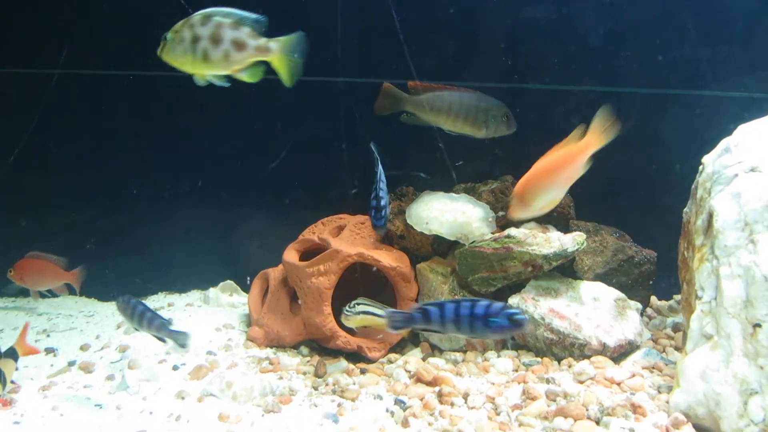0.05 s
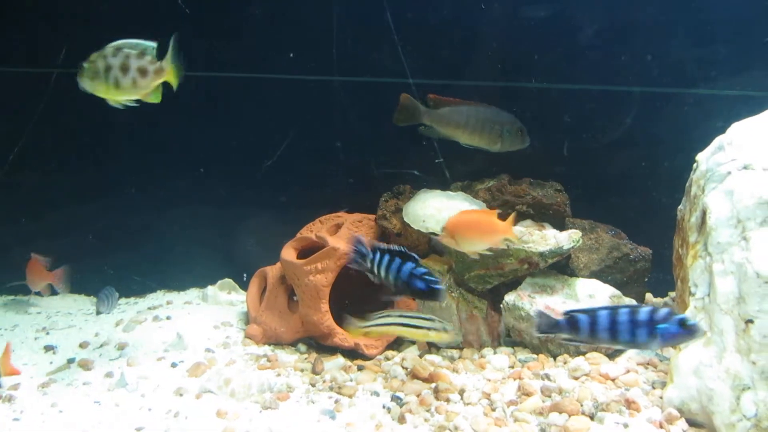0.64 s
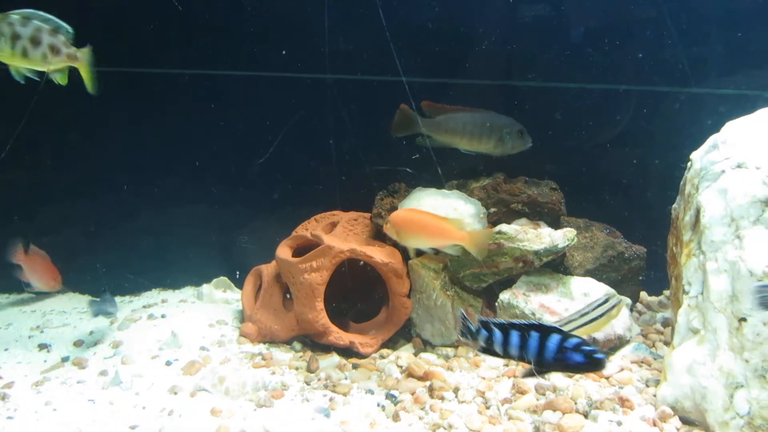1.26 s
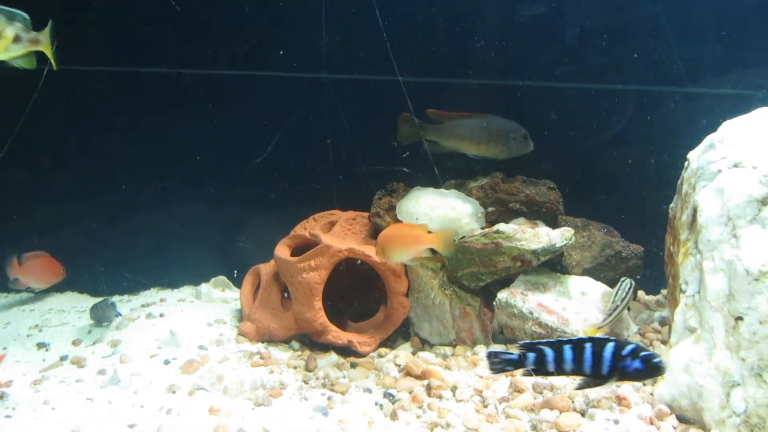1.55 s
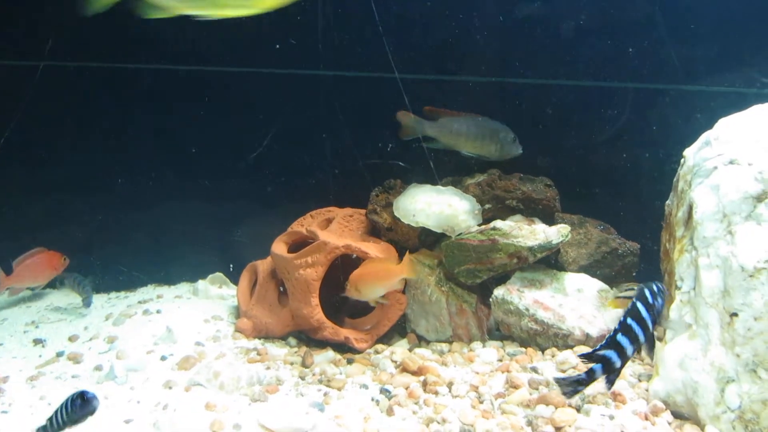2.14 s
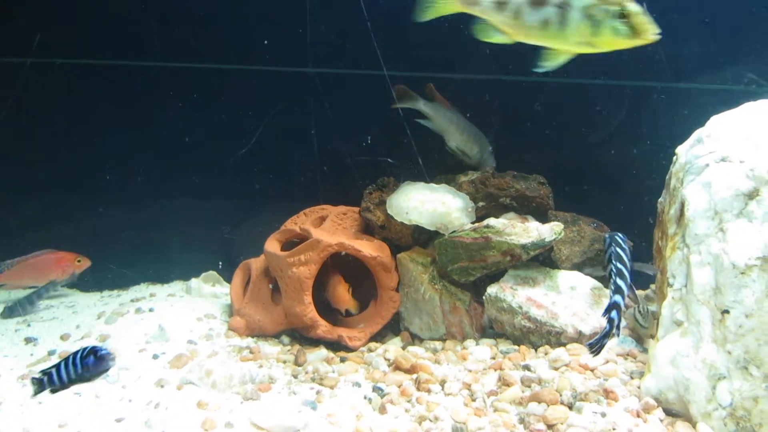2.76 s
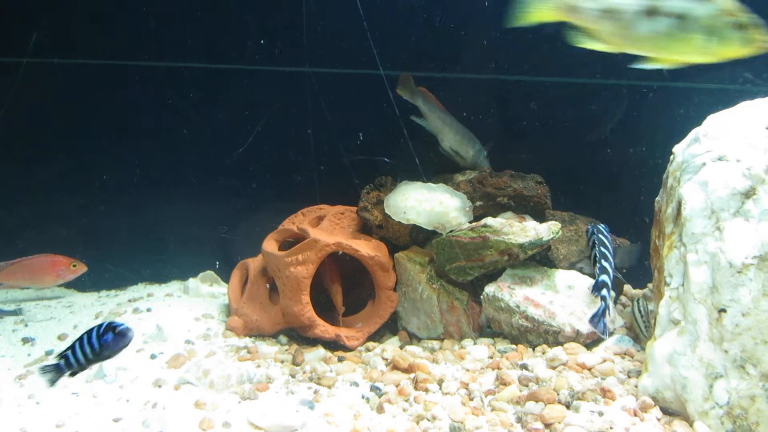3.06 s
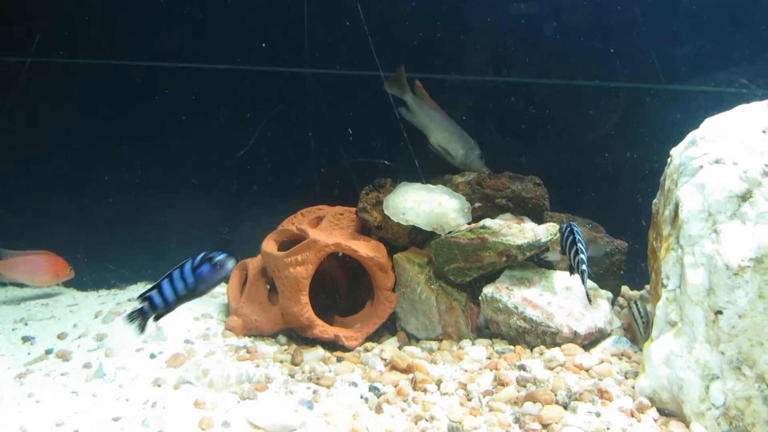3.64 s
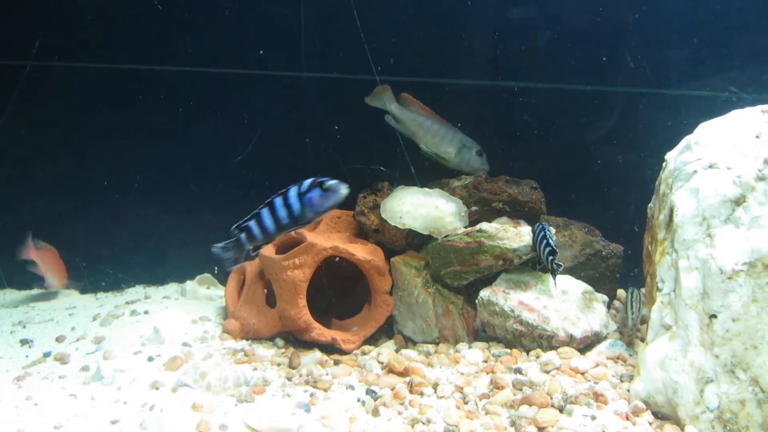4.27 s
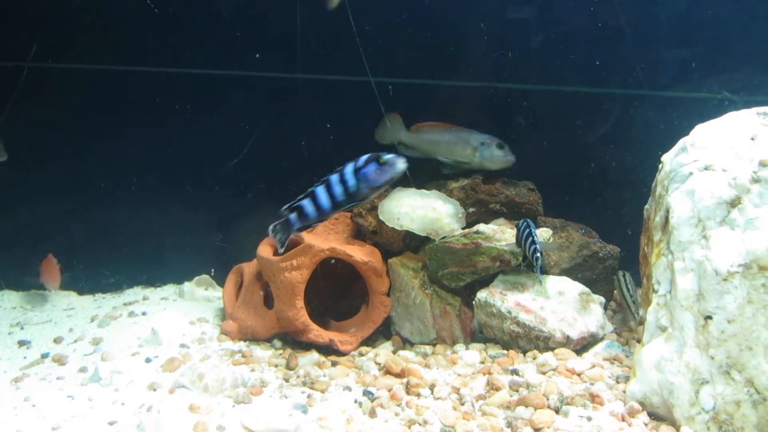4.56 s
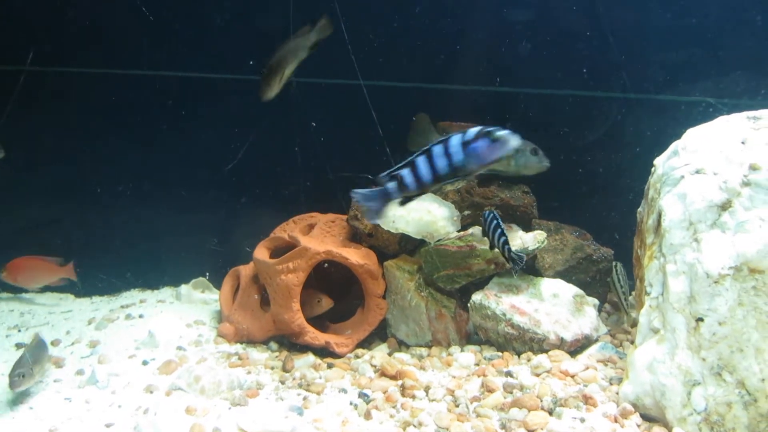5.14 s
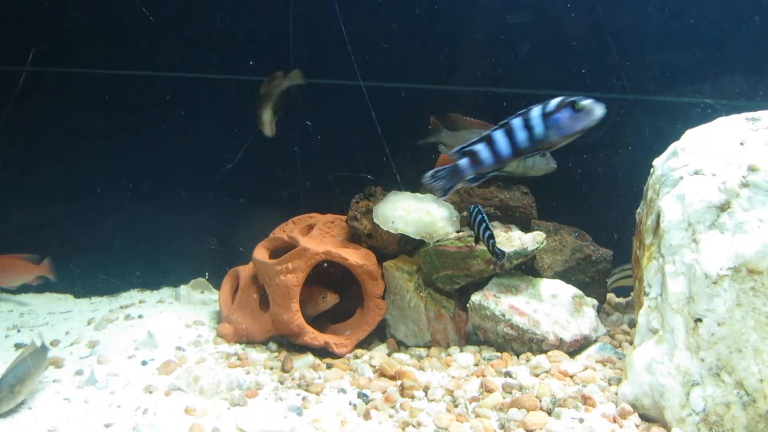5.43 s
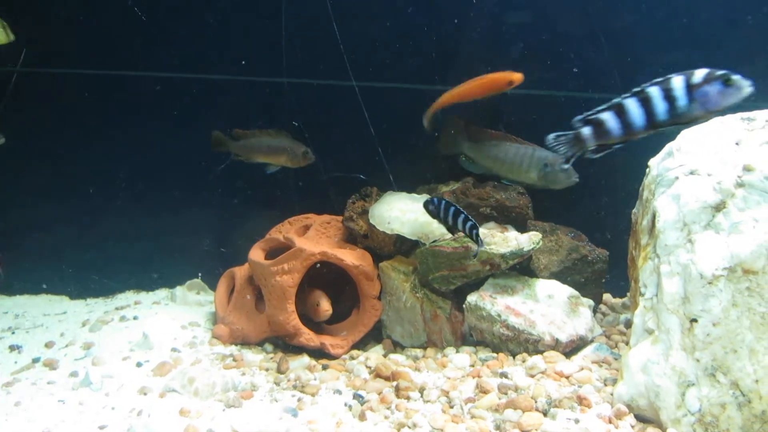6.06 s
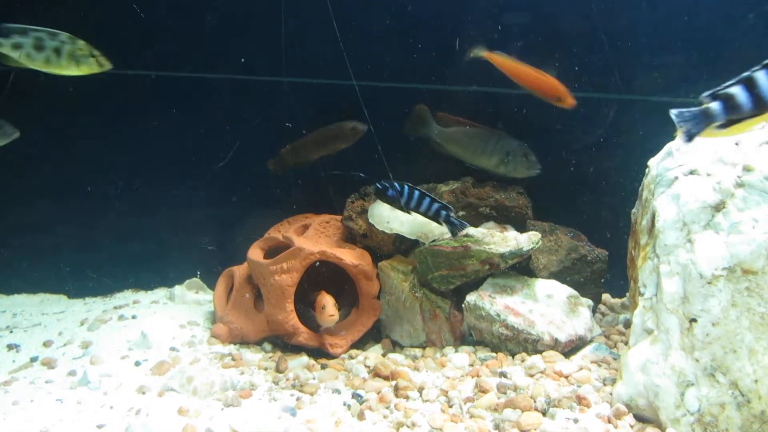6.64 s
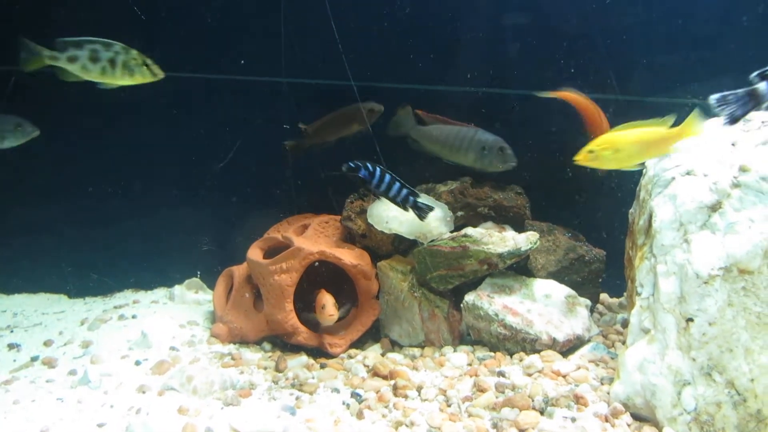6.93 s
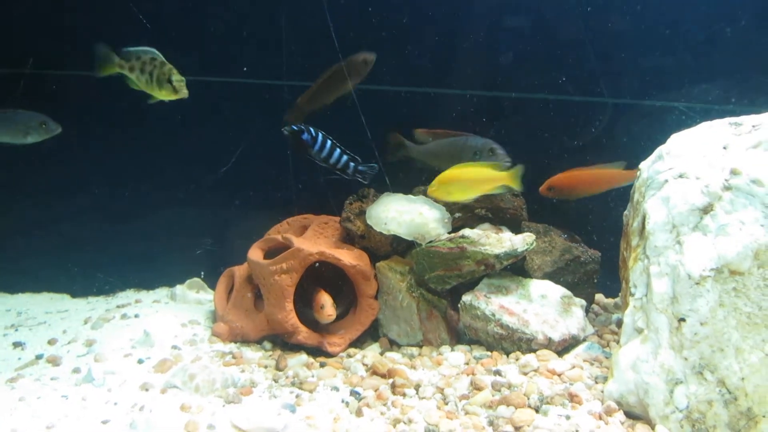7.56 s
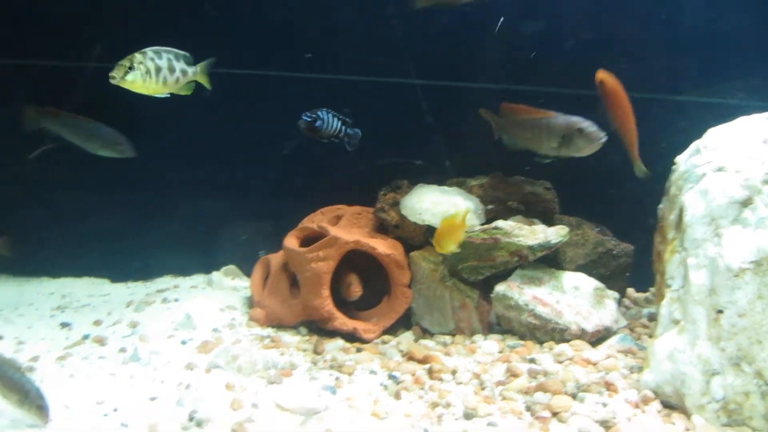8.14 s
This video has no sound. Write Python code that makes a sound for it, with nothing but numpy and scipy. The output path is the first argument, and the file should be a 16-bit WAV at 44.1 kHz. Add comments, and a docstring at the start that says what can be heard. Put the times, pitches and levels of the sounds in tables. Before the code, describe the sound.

Water trickles and bubbles quietly in an indoor aquarium over a low pump hum, with occasional little glugs and high plinks.

```python
"""A fish tank in a quiet room

The filter pump hums on mains power and its housing buzzes faintly. The water flowing out burbles
softly with short surges, the outlet gulps air now and then, and drops plink between the glass walls.
A mid-side microphone hears it: one channel for the middle, and a loud, hissy one for the sides.
Some electronics whistle very high."""
import sys
import numpy as np
from scipy import signal
from scipy.fft import rfft, irfft
from scipy.io import wavfile

SR = 44100
rng = np.random.default_rng(int(sys.argv[2]) if len(sys.argv) > 2 else 0)


def log_audio(samples):
    """Write samples as a 16-bit WAV file to the path given in sys.argv[1]."""
    # one column per channel
    frames = np.atleast_2d(samples).T
    # limit to full scale, then quantise
    limited = np.clip(frames, -1, 1)
    pcm = np.round(limited * 32767).astype(np.int16)
    wavfile.write(sys.argv[1], SR, pcm)


N = 365588
TIME = np.arange(N) / SR


# the tones of the shaking pump: multiple of the mains frequency, level/dB
PUMP_TONES = [(1, -63), (2, -47.5), (3, -63.5), (4, -64.5), (6, -79), (7, -74), (9, -71), (10, -68.5),
              (11, -64.5), (15, -65), (16, -65), (17, -67.5), (19, -71), (27, -89), (29, -80), (32, -86.5),
              (33, -76), (42, -76.5), (45, -82), (46, -69.5), (49, -74.5), (52, -80), (53, -74),
              (55, -79.5)]


def pump(mains_hz=50.0125, rotor_hz=48.995, rotor_db=-67):
    """Mains power shakes the pump: the low hum is firm, the housing's high buzz wavers with the load."""
    # the rotor turns just slower than the mains, so the two throb about once a second
    out = -tone(rotor_hz, rotor_db)
    for multiple, db in PUMP_TONES:
        hz = multiple * mains_hz
        waver_db = -0.05 + 1.5 * hz / (hz + 800)
        start_cycles = (multiple - 1) * rng.random()
        out += tone(hz, db + waver_db * drift(per_s=5), start_cycles)
    return out


# surges of the outflow: t/s, hold/s, swell/dB, f/Hz of the big bubble that drips() plays
FLOW_SURGES = [(.411, 0.36, 4.5, 1096), (1.43, 0.067, 7, 1170), (2.82, 0.23, 5.5, 1200),
               (3.38, .06, 2, 1100), (3.79, 0.043, 10.5, 1145), (4.11, .04, 2.5, 1490),
               (4.411, .01, 0, 1340), (4.66, .03, 5, 1235), (5.208, .01, 2, 1377), (5.52, 0.11, 5.5, 1234),
               (6.58, .1, 3, 800), (7.231, 0.055, 4.5, 1230), (7.54, 0.032, 3.5, 1130),
               (7.77, .01, 0, 1305), (8.22, .04, 2, 1090)]


def outflow_db(steady_db=-57, uneven_db=1.0, attack_s=0.057, ebb_s=0.039):
    """How loud the water flows: nearly even, but for surges that swell, hold and ebb away."""
    level = steady_db + uneven_db * drift(per_s=7)
    for s, hold_s, swell_db, _ in FLOW_SURGES:
        attack = np.clip(1 + (TIME - s) / attack_s, 0, 1)
        ebb = np.exp(-np.maximum(TIME - s - hold_s, 0) / ebb_s)
        level += swell_db * attack * ebb
    return level


# how strong the small bubbles are at each pitch: f/Hz, relative level/dB
BUBBLE_LEVELS = [(170, -1), (205, -9), (240, -5), (285, -3), (350, -1), (470, -21.5), (640, -8.5),
                 (770, 3.5), (1000, -1.5), (1280, 1), (1550, -8), (1800, -10.5)]
# the deep bubbles churn harder for a while: t/s, gain/dB
DEEP_CHURN = [(0, -1), (2.5, -1), (2.9, 3), (4.1, 3), (4.45, -1)]


def burble(per_s=520, spread_db=3.0, sharpness=12, pitches=30, deep_below_hz=450):
    """The outflow makes small bubbles at random. Each rings briefly, at a pitch set by its size."""
    strengths = np.minimum(rng.exponential(1, N), 3.5)
    signs = rng.choice([-1, 1], N)
    births = np.flatnonzero(rng.random(N) < per_s / SR)
    pitch_index = rng.integers(0, pitches, N)[births]
    churn = from_db(np.interp(TIME, *np.transpose(DEEP_CHURN)))
    out = np.zeros(N)
    for k, hz in enumerate(np.geomspace(170, 1800, pitches)):
        at = births[pitch_index == k]
        clicks = np.zeros(N)
        # deep bubbles are more alike in strength
        clicks[at] = signs[at] * from_db(spread_db * strengths[at] * np.sqrt(hz / 1000))
        soft = resonate(clicks, hz, hz)   # a bubble pinches off without a sharp click
        ringing = rms_one(resonate(soft, hz, hz / sharpness))
        out += from_db(at_hz(BUBBLE_LEVELS, hz)) * ringing * (churn if hz < deep_below_hz else 1)
    return from_db(outflow_db()) * rms_one(echoes(out, glass_db=-4.5, room_db=3.0))


# gulps of air: t/s, relative level/dB, thump gain/dB, splash gain/dB
AIR_GULPS = [(1.425, -49, 0, -14), (1.676, -48, -23, -6), (1.861, -47.5, -13, -10), (2.065, -45, -13, -20),
             (3.156, -44, -3, -15), (3.516, -46.5, -7, -21), (3.589, -49.5, -19, -14), (3.779, -45, 3, -12),
             (3.985, -44, -3, -9), (4.166, -51.5, -1, -7), (4.524, -47, -20, -8), (5.214, -48.5, 0, -4),
             (5.877, -44, -14, -20), (6.02, -47, -17, -4.5), (6.671, -48, 0, -12), (6.824, -53, -19, -14),
             (6.984, -52.5, -8, -4), (7.159, -50, -10, -15), (7.983, -46, -10, -23),
             (8.154, -42.5, -14, -28)]
# the notes of the hollow outlet, its low thump first: f/Hz, width/Hz, relative level/dB
OUTLET_NOTES = [(295, 150, 4), (558, 34, 6.5), (741, 46, 2.5)]


def gulps(burst_s=0.0212, glide_hz=(450, 635), knock_hz=420, gain_db=6.0):
    """Air breaks into the outlet: a knock, a small splash and a rising glug that makes the hollow ring."""
    out, t = np.zeros(N), TIME[:SR // 3]
    glug = glide(np.interp(t, [0, burst_s], glide_hz))
    knock = from_db(-4) * np.sin(2 * np.pi * knock_hz * t) * fade(t, 0.016)
    for s, db, thump_db, splash_db in AIR_GULPS:
        flutter, splash = rng.standard_normal((2, len(t)))
        flutter = band(flutter, 530, 1200, 560, 1400)
        splash = from_db(splash_db - 5) * band(splash, 900, 1300, 990, 1500) * fade(t, 0.11)
        push = (glug + from_db(-6) * flutter) * np.exp(-(t / burst_s) ** 6)
        thump, *notes = [from_db(note_db) * band(push, hz, width, hz, hz / 2)
                         for hz, width, note_db in OUTLET_NOTES]
        ring = sum(notes) + from_db(5) * rms_one(push)
        gulp = (ring + from_db(thump_db) * thump) / np.abs(ring).max() + knock + splash
        add(out, s, from_db(db + gain_db) * echoes(gulp, glass_db=-23, room_db=-6.5))
    return out


# drops falling on the water, the first two rows faint crackles at the surface: t/s, f/Hz, relative level/dB,
# ring length/cycles
WATER_DROPS = [(1.046, 3600, -44, 5), (1.3, 4200, -43, 6), (1.4342, 5660, -23.5, 9.9),
               (1.863, 2465, -40, 85), (2.907, 5640, -34, 12), (3.161, 2070, -44.5, 75),
               (4.167, 3320, -39.5, 12), (4.2282, 6320, -37, 8.2), (4.526, 2090, -44.5, 45),
               (4.657, 6100, -37, 14), (4.977, 9700, -42.5, 12), (5.218, 2310, -47, 35),
               (5.565, 5900, -39.5, 25), (5.7673, 6600, -41, 14), (5.898, 6000, -35, 57),
               (6.705, 4950, -31, 13), (6.824, 6300, -27.5, 20), (6.884, 6060, -41, 30),
               (7.021, 6600, -38, 15), (7.160, 4560, -28.5, 10)]


def drips(rise=0.011, onset_cycles=0.86, gain_db=4.0, big_db=-45, big_cycles=41):
    """Each drop or surge traps a bubble, which rings and rises a little in pitch near the surface."""
    out, t = np.zeros(N), TIME[:SR // 3]
    big_bubbles = [(s, hz, big_db, big_cycles) for s, _, _, hz in FLOW_SURGES]
    for s, hz, db, cycles in list(WATER_DROPS) + big_bubbles:
        ring_s = cycles / hz
        pitch_hz = hz * (1 + rise * np.minimum(t / ring_s, 1))
        onset = 1 - np.exp(-(hz * t / onset_cycles) ** 2)
        plink = glide(pitch_hz) * onset * fade(t, ring_s)
        plink = resonate(plink, hz, hz / 2)   # the water rounds off the edges of the ping
        plink /= np.abs(plink).max()
        heard = echoes(plink, glass_db=2, room_db=0.5, glass_fade_s=0.034)
        heard *= np.linalg.norm(plink) / np.linalg.norm(heard)   # same energy, spread out in time
        add(out, s, from_db(db + gain_db) * heard)
    return out


def spatter(per_s=60, spread_db=3.5, level_db=-69, pitches=10):
    """Tiny bubbles burst at the surface with faint ticks."""
    out = np.zeros(N)
    for hz in np.geomspace(2900, 9000, pitches):
        bursts = rng.random(N) < per_s / pitches / SR
        strengths = from_db(spread_db * np.minimum(rng.exponential(1, N), 3))
        out += resonate(bursts * strengths, hz, hz / 5) / hz
    return from_db(level_db) * rms_one(echoes(out, glass_db=12, room_db=5))


# the even rush of water and room: f/Hz, level/dB per Hz
WASH_SPECTRUM = [(22, -106), (40, -85), (70, -87), (130, -86.5), (175, -82.5), (300, -79), (440, -91),
                 (800, -87.5), (1250, -87.5), (1850, -97.5), (2300, -92), (3100, -98.5), (6700, -97),
                 (8300, -103.5), (15000, -111)]


def wash():
    """The water and the room blend into one soft, steady noise."""
    return noise(WASH_SPECTRUM)


# the hiss of the microphone's side channel: f/Hz, level/dB per Hz
SIDE_HISS_SPECTRUM = [(22, -76), (40, -71), (300, -79.5), (1000, -79), (2300, -85.5), (5000, -92.5),
                      (8000, -96.5), (15000, -109)]


def side_channel(mid, bass_db=5.0, treble_db=-14, split_hz=750):
    """The side channel hisses, and lifts the bass of the tank's filter, which sits off to the left."""
    bass = signal.lfilter(*signal.butter(1, split_hz, fs=SR), mid)
    return from_db(bass_db) * bass + from_db(treble_db) * (mid - bass) + noise(SIDE_HISS_SPECTRUM)


# the whistle of the electronics: f/Hz, level/dB on the right
WHISTLE_TONES = [(15733.7, -68.8), (15748, -74.8)]


def whistle(left_db=-8):
    """Two thin electronic tones, so close in pitch that they flutter, louder on the right."""
    return sum(tone(hz, db) for hz, db in WHISTLE_TONES) * from_db([[left_db], [0]])


# thin bands in the hiss: f/Hz, width/Hz, level/dB
HISS_BANDS = [(5810, 140, -87), (6220, 74, -70.5), (7900, 33, -91)]


def singing_hiss():
    """Bands of hiss so narrow that they whistle faintly."""
    return sum(from_db(db) * band(rng.standard_normal(N), hz, width, hz, 4 * width)
               for hz, width, db in HISS_BANDS)


def echoes(x, glass_db, room_db, glass_fade_s=0.054, room_fade_s=0.23):
    """The sound itself, a quick clatter between the glass walls, then the echo of the room."""
    t = TIME[:SR // 2]
    paths = np.zeros(len(t))
    for db, fade_s, delay_s in (glass_db, glass_fade_s, .001), (room_db, room_fade_s, .008):
        tail = rng.standard_normal(len(t)) * fade(t, fade_s) * (t > delay_s)
        paths += from_db(db) * tail / np.linalg.norm(tail)
    return x + signal.fftconvolve(x, paths)[:len(x)]


def resonate(x, hz, width_hz):
    """Make a sound ring at one pitch; the narrower the width, the longer it rings."""
    r = np.exp(-np.pi * width_hz / SR)
    feedback = [1, -2 * r * np.cos(2 * np.pi * hz / SR), r * r]
    return signal.lfilter(np.array([1, 0, -1]) * (1 - r * r) / 2, feedback, x + 1e-18)


def band(x, hz, width_hz, second_hz, second_width_hz):
    """Pass a sound through two resonances in a row and bring its strength to 1."""
    return rms_one(resonate(resonate(x, hz, width_hz), second_hz, second_width_hz))


def noise(spectrum):
    """Steady noise, shaped by a table of levels from low to high pitch."""
    gain = from_db(at_hz(spectrum, np.arange(N // 2 + 1) * SR / N)) * np.sqrt(SR / 2)
    return irfft(rfft(rng.standard_normal(N)) * gain, N)


def tone(hz, db, start_cycles=0):
    """A pure tone at an average (rms) level."""
    return np.sqrt(2) * from_db(db) * np.sin(2 * np.pi * (hz * TIME + start_cycles))


def glide(hz):
    """A pure tone that follows a changing pitch."""
    return np.sin(2 * np.pi * np.cumsum(hz) / SR)


def fade(t, fade_s):
    """Die away by 60 dB every fade_s seconds."""
    return from_db(-60 * t / fade_s)


def drift(per_s):
    """A slow random wander, about 1 in size."""
    points = rng.standard_normal(int(per_s * N / SR) + 2)
    return rms_one(np.interp(TIME * per_s, np.arange(len(points)), points))


def at_hz(points, hz):
    """Read between the rows of a table, giving every octave the same room."""
    known_hz, values = np.transpose(points)
    return np.interp(np.log(np.maximum(hz, 1)), np.log(known_hz), values)


def add(track, s, sound):
    """Mix a sound in, starting at s seconds."""
    start = round(s * SR)
    track[start:start + len(sound)] += sound[:N - start]


def from_db(db):
    """Turn decibels into a number to multiply by."""
    return 10 ** (np.asarray(db) / 20)


def rms_one(x):
    """Bring the average strength (rms) to 1."""
    return x / np.sqrt(np.mean(x ** 2) + 1e-20)


def scene():
    """Left is middle plus side, right is middle minus side. The drops fall near the middle."""
    mid = pump() + burble() + gulps() + spatter() + singing_hiss() + wash()
    side = side_channel(mid)
    plinks = drips()
    plink_echoes = echoes(plinks, glass_db=5, room_db=-23) - plinks
    side += from_db(-15) * plink_echoes   # only the echoes of the plinks come from the sides
    return mid + plinks + side * [[1], [-1]] + whistle()


def record(dry, cutoff_hz=15900):
    """Cut off the very highest treble steeply."""
    return signal.sosfilt(signal.ellip(12, .1, 80, cutoff_hz, fs=SR, output="sos"), dry)


dry = scene()
out = record(dry)
log_audio(out)
```